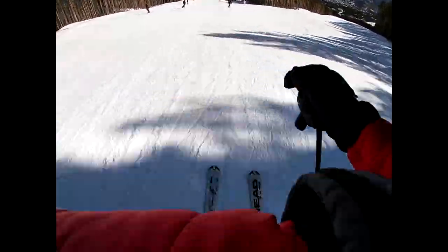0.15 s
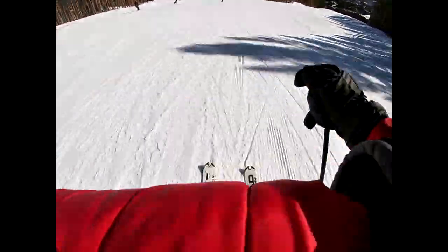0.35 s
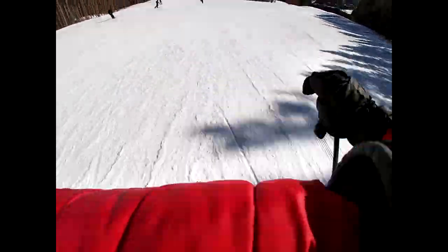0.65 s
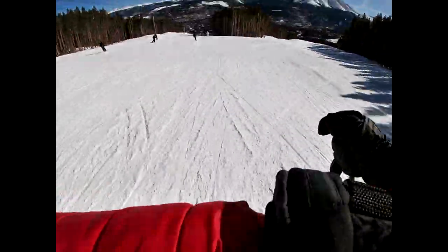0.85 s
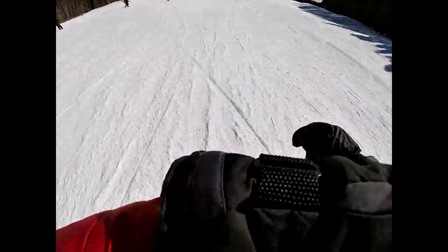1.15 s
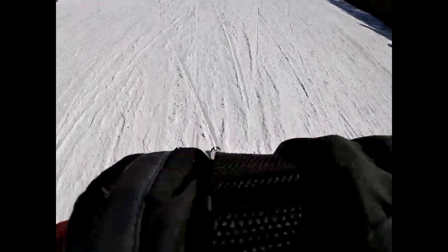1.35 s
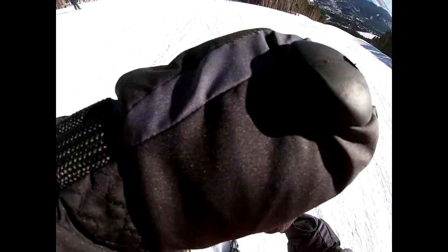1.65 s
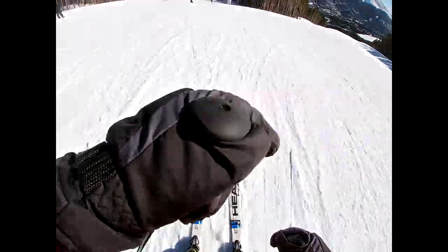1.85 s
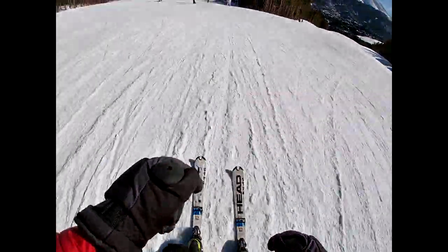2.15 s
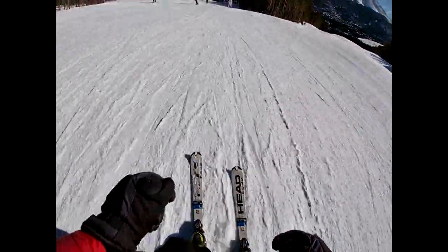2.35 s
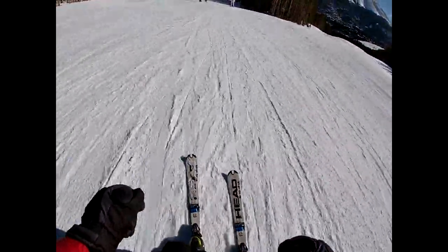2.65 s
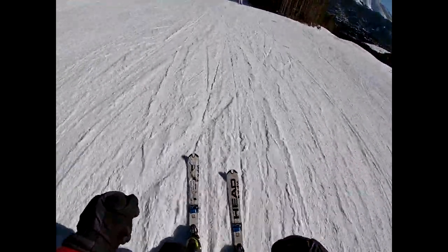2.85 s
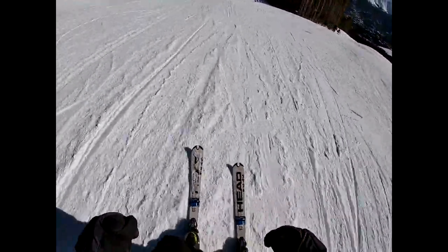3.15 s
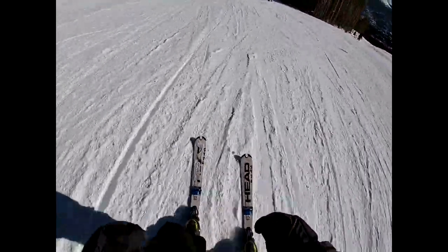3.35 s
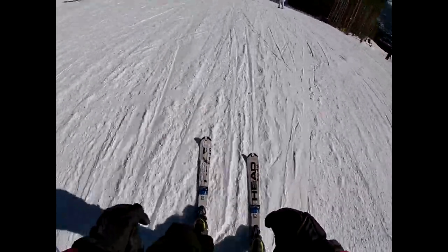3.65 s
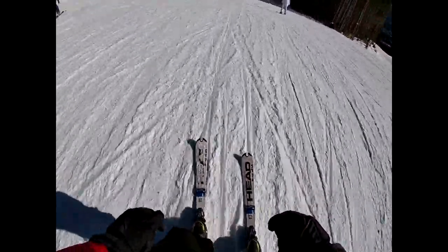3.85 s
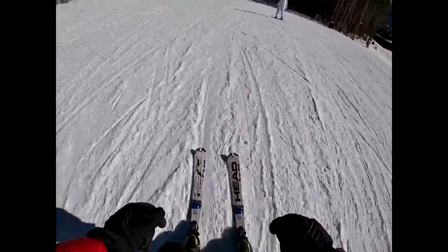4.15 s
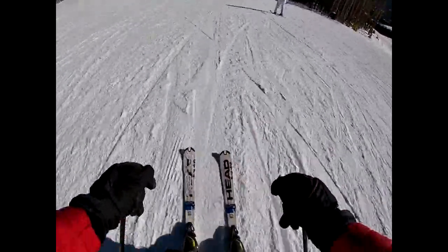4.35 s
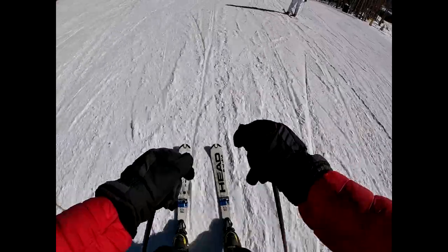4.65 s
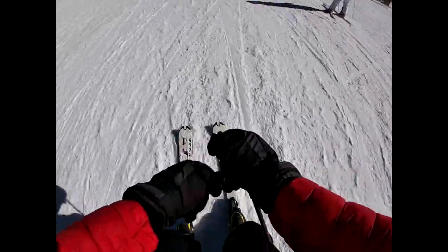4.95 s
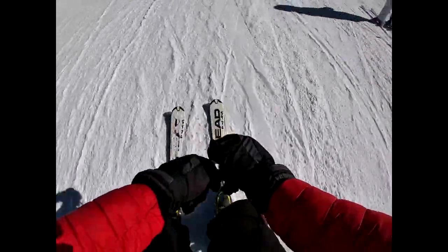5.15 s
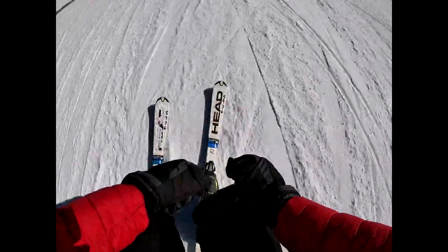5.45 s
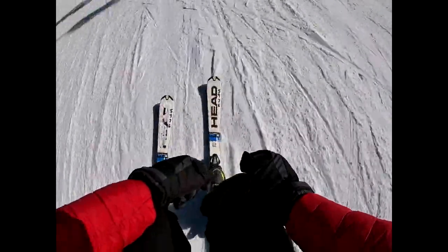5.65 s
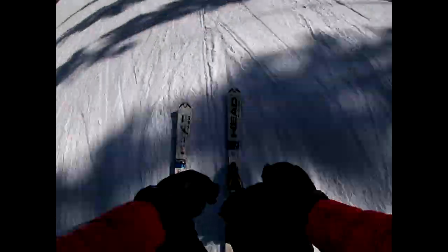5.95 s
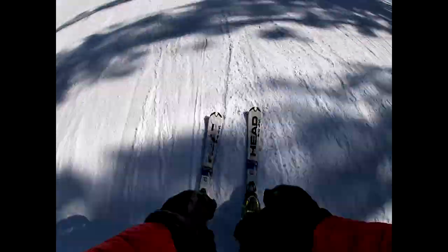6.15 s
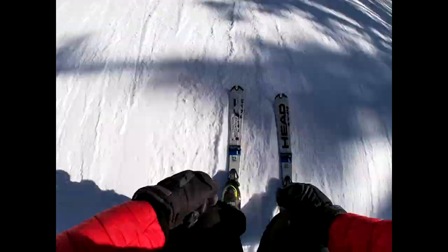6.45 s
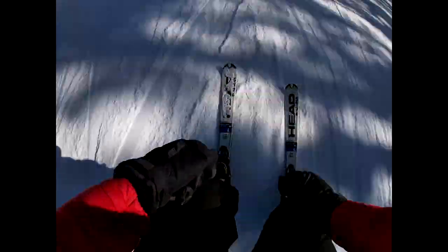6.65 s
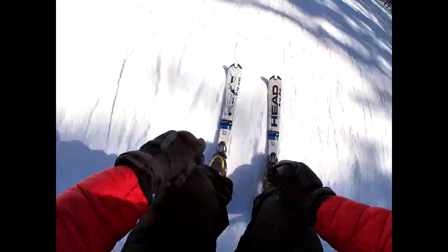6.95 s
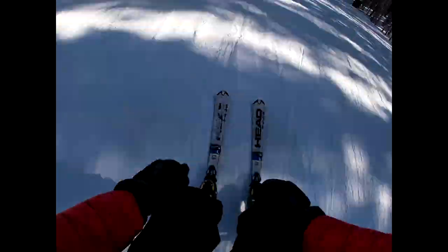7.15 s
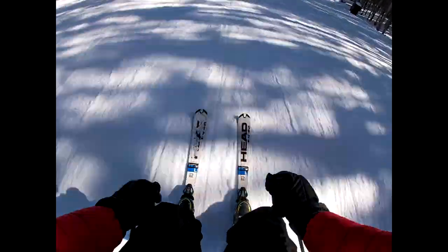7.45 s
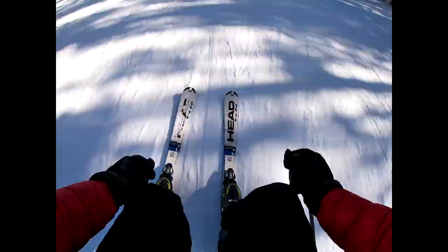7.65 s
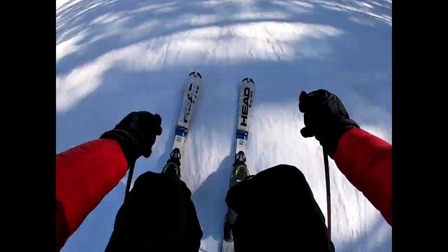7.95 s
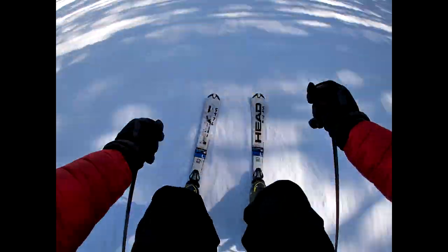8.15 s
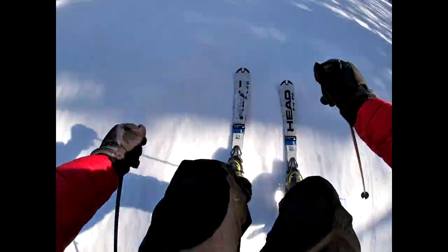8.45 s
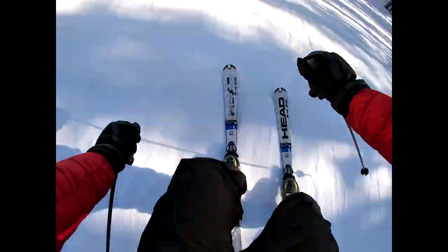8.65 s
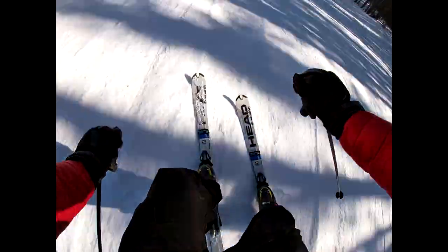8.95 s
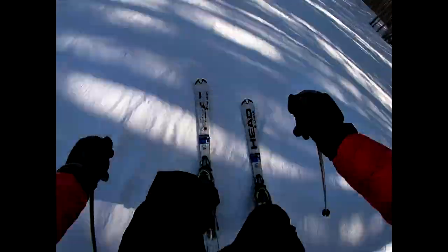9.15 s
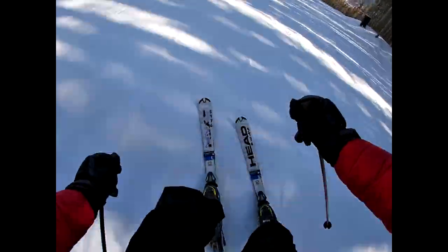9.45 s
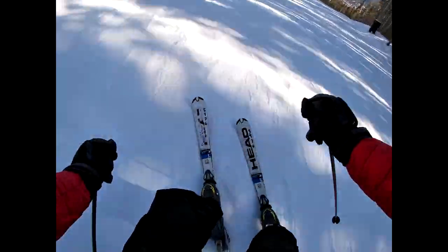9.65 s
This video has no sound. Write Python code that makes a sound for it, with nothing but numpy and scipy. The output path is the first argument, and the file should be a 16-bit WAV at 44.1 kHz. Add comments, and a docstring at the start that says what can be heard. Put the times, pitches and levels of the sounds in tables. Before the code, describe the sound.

Wind rumbles and buffets a chest-worn microphone while skis scrape, hiss and clack over hard, grainy snow, the scraping growing harsher toward the end.

```python
"""A groomed ski slope in the open, heard from a small camera on the skier's chest, the skis below.
Wind over the microphone port rumbles, buffets and tears into a rough flutter: filtered noise in gusts.
Gloves and sleeves passing close to the port add slaps, hollow wakes and one tick.
The ski edges grind over snow grains (dense random clicks), ring through damped resonances,
skid, hiss, throw a fine spray, swish, thud and clack on hard ridges."""
import sys
import numpy as np
from scipy import signal
from scipy.fft import rfft, irfft
from scipy.io import wavfile
from scipy.ndimage import uniform_filter1d, map_coordinates

SR = 44100
rng = np.random.default_rng(int(sys.argv[2]) if len(sys.argv) > 2 else 0)


def dump_mix(stems):
    """Bounce the given channels to the path in sys.argv[1] as a 16-bit WAV at rate SR."""
    frames = np.atleast_2d(stems).T  # one column per channel
    limited = np.clip(frames, -1, 1)  # hard clip at full scale
    pcm = np.round(limited * 32767).astype(np.int16)
    wavfile.write(sys.argv[1], SR, pcm)


N = 432180
TIME = np.arange(N) / SR


def undb(db):
    """Decibels to gain."""
    return 10 ** (np.asarray(db) / 20)


def unit(x):
    """Scale to an rms of one."""
    return x / np.sqrt(np.mean(x ** 2))


def controls(table):
    """The columns of a curve table after its time column, one value per sample."""
    s, *columns = np.transpose(table)
    return [np.interp(TIME, s, column) for column in columns]


def colour(x, outline):
    """Filter by an outline of (freq_hz, gain_db), joined by straight lines over log frequency."""
    hz, db = np.transpose(outline)
    bins_hz = np.maximum(np.arange(N // 2 + 1) * SR / N, 1)
    gain = undb(np.interp(np.log(bins_hz), np.log(hz), db))
    return irfft(rfft(x) * gain, N)


def noise():
    """White noise."""
    return rng.standard_normal(N)


def walk(rate):
    """Smooth random curve with rate knots a second; rms of one, extremes softened."""
    knots = rng.standard_normal(N // 20)
    curve = map_coordinates(knots, [TIME * rate], order=2, mode="wrap")
    return unit(np.tanh(curve))


def steady(x, span):
    """Even out the swells that last longer than span seconds."""
    power = uniform_filter1d(x ** 2, int(span * SR))
    return x / np.sqrt(power + 1e-12)


def bursts(times, levels_db, rise_s, decay_s):
    """An envelope that jumps up at each time and dies away."""
    out = np.zeros(N)
    age = np.arange(SR // 10) / SR
    shape = (1 - np.exp(-age / rise_s)) * np.exp(-age / decay_s)
    for s, db in zip(times, levels_db):
        i = int(s * SR)
        out[i:i + len(age)] += undb(db) * shape[:N - i]
    return out


def swells(table, attack_s, release_s):
    """Attack, hold and release for each (start, hold length, size) row, summed."""
    out = np.zeros(N)
    for s, length, size in table:
        corners = [s - attack_s, s, s + length, s + length + release_s]
        part = slice(*np.searchsorted(TIME, [corners[0], corners[-1]]))
        out[part] += size * np.interp(TIME[part], corners, [0, 1, 1, 0]) ** 2
    return out


def gain_swells(table, attack_s, release_s):
    """A gain envelope from (start, hold length, dB) rows."""
    gains = [(s, length, undb(db)) for s, length, db in table]
    return swells(gains, attack_s, release_s)


def with_swells(base_db, table, attack_s, release_s):
    """A level in dB with the power of (start, hold length, dB) swells on top."""
    powers = [(s, length, undb(db) ** 2) for s, length, db in table]
    return 10 * np.log10(undb(base_db) ** 2 + swells(powers, attack_s, release_s))


def grains(rate, spread_db):
    """Snow crystals breaking: random clicks, rate a second, of unequal but capped size."""
    hit = rng.random(N) < rate / SR
    size = undb(spread_db * np.minimum(rng.exponential(size=N), 3))
    return unit(hit * size * np.clip(noise(), -2, 2))


# steady airflow at the port, weakest from 2 to 3 s; columns: time_s, rumble_db, buffet_db
AIRFLOW = [(0, -23, -32), (.65, -24, -35.5), (1.12, -19, -32), (1.37, -28.5, -34), (1.47, -32.5, -32),
           (1.572, -19, -28), (1.6, -22, -20), (1.995, -17.5, -23.5), (2.035, -37, -37.5),
           (2.35, -37.5, -43), (2.5, -31, -41), (3, -34.5, -39), (3.2, -27.5, -33), (4, -26, -32),
           (5.3, -23, -29.5), (5.9, -21, -30), (6.2, -22.5, -30.5), (6.75, -24.5, -31.5), (7.9, -23.5, -31),
           (8.5, -20, -30.5), (9.1, -26.5, -31.5), (9.8, -28, -36.5)]
# brief changes of that airflow, mostly lulls; columns: start_s, hold_s, change_db
LULLS = [(.55, 0.042, -4.5), (1.535, .025, -7), (1.64, .022, -1.5), (1.732, 0.016, 3), (1.938, .014, -1),
         (3.46, 0.14, -2), (3.74, 0.098, -2), (4.25, 0.019, -2), (5.16, 0.045, 1), (5.53, 0.052, -5),
         (6.11, 0.053, -1.5), (6.365, 0.043, -1), (6.53, .02, -1), (6.75, 0.047, -8), (7.13, 0.075, -4.5),
         (7.4, 0.022, -9), (7.88, 0.063, -4), (8.7, 0.055, -5)]
# gusts on top of the airflow; columns: start_s, hold_s, rumble_db, buffet_db, tear_db
GUSTS = [(0.092, 0.18, -29, -27, -36.5), (0.432, 0.067, -19, -30.5, -37), (0.728, 0.08, -16.5, -21, -28.5),
         (0.827, 0.11, -17, -26.5, -33.5), (0.968, 0.13, -17, -19, -31.5), (1.224, 0.046, -19.5, -24, -44),
         (1.584, 0.03, -18, -18, -39), (1.673, 0.052, -18, -15.5, -23.5), (1.772, 0.16, -27, -15.5, -32.5),
         (1.957, 0.014, -24, -15.5, -32), (3.295, 0.091, -27, -32, -50), (3.646, 0.032, -19, -37, -51),
         (4.038, 0.17, -23, -23.5, -31), (4.371, 0.039, -17.5, -28.5, -35), (4.584, 0.12, -22, -26.5, -51),
         (5.012, 0.12, -20.5, -24, -31.5), (5.607, 0.1, -24, -38, -49), (6.23, 0.025, -21, -34, -29.5),
         (6.438, 0.063, -19.5, -30, -32.5), (6.602, 0.048, -23, -32, -35),
         (6.838, 0.102, -18, -30.5, -30.5), (7.037, 0.033, -20, -41, -35.5),
         (7.614, 0.037, -19.5, -34, -53), (7.756, 0.074, -27, -25.5, -36), (8.03, 0.23, -22, -29, -39),
         (8.273, 0.089, -29, -21, -31.5), (8.47, 0.091, -25, -33, -39), (8.782, 0.028, -26, -26, -29),
         (9.199, 0.049, -23.5, -35, -30.5), (9.342, 0.15, -23, -31, -37)]
TEAR_ONSET_DB, TEAR_GROWTH = -32.5, 0.39  # reference buffeting; extra dB of tearing per dB from there
TEAR_UNDER_DB = -13  # tearing at the reference, relative to the buffeting


def air_levels():
    """Rumble, buffeting and tearing in dB: steady airflow with lulls, and the power of gusts added."""
    rumble_db, buffet_db = controls(AIRFLOW)
    lull_db = swells(LULLS, attack_s=0.011, release_s=0.011)
    rumble_db = rumble_db + lull_db + 2.0 * walk(rate=14)
    buffet_db = buffet_db + lull_db + 1.57 * walk(rate=14)
    # tearing grows faster with wind speed than the buffeting does
    tear_db = buffet_db + TEAR_UNDER_DB + TEAR_GROWTH * (buffet_db - TEAR_ONSET_DB)
    s, length, *gust_dbs = np.transpose(GUSTS)
    return [with_swells(flow_db, zip(s, length, gust_db), attack_s=0.0093, release_s=0.017)
            for flow_db, gust_db in zip([rumble_db, buffet_db, tear_db], gust_dbs)]


# colour of large eddies; columns: freq_hz, gain_db
RUMBLE_COLOUR = [(12, -9.5), (25, 3), (50, 1.5), (85, -0.5), (130, -8.5), (190, -27.5), (350, -53),
                 (800, -86)]
# colour of small eddies; columns: freq_hz, gain_db
BUFFET_COLOUR = [(60, -9.5), (130, 1.5), (210, 0.5), (310, -7), (480, -17.5), (900, -31.5), (2500, -92)]
# colour of flow tearing at the port; columns: freq_hz, gain_db
TEAR_COLOUR = [(150, -37.5), (380, 5.5), (700, -1), (1200, -8.5), (2500, -19), (4200, -30), (5800, -49),
               (7500, -68.5), (14000, -105)]


def wind(rumble_db, buffet_db, tear_db, eddy_db):
    """Large eddies rumble, small ones come in flurries, and the flow tears at the edge of the port."""
    flurry = walk(rate=70)
    rumble = steady(colour(noise(), RUMBLE_COLOUR), span=0.087)
    buffet = steady(colour(noise() * undb(eddy_db * flurry), BUFFET_COLOUR), span=0.04)
    # the flow separates on the pressure peaks, so the tearing comes in short rasps
    push = np.abs(rumble + buffet) ** 1.03 + 0.5
    tear = steady(colour(noise() * push * undb(1.4 * flurry), TEAR_COLOUR), span=0.19)
    return rumble * undb(rumble_db) + buffet * undb(buffet_db) + tear * undb(tear_db)


# large single eddies at the port, before the trim puff_db; columns: centre_s, level_db
PUFFS = [(1.135, -19), (1.18, -24), (2.003, -23), (3.665, -18.5), (3.88, -20), (3.93, -20.5), (4.06, -17),
         (4.183, -18.5), (4.39, -15.5), (4.6, -16.5), (4.682, -16.5), (4.905, -19.5), (4.95, -18.5),
         (5.05, -13.5), (5.243, -15), (5.283, -16.5), (5.4, -19), (5.472, -19), (5.63, -17.5), (5.71, -16),
         (5.79, -18.5), (5.987, -15.5), (6.25, -16), (6.471, -13.5), (6.6, -23), (6.652, -15.5),
         (6.975, -14.5), (7.06, -17), (7.3, -16), (7.37, -25), (7.645, -16), (7.812, -19.5), (8.053, -16),
         (8.21, -14), (8.29, -16), (8.525, -14.5), (8.815, -13.5), (8.96, -20), (9.225, -20), (9.425, -21)]
# their low, soft colour; columns: freq_hz, gain_db
PUFF_COLOUR = [(30, -24), (70, -2.5), (120, 0.5), (200, -7.5), (330, -20.5), (800, -45), (2000, -90)]


def puffs(length_s, puff_db):
    """Each large eddy presses on the port with a rounded swell of a few low cycles."""
    envelope = sum(undb(db) * np.exp(-(2 * (TIME - s) / length_s) ** 2) for s, db in PUFFS)
    return steady(colour(noise(), PUFF_COLOUR), span=0.0173) * envelope * undb(puff_db)


# the wake of a glove or sleeve crossing close to the port; columns: start_s, hold_s, level_db
WAKES = [(1.038, 0.05, -26.5), (1.594, .015, -26), (1.784, .022, -25), (1.823, .022, -23),
         (1.866, 0.024, -21), (1.91, .022, -25), (1.963, .02, -20.5)]
# its hollow colour; columns: freq_hz, gain_db
WAKE_COLOUR = [(130, -25), (210, -1), (280, 4), (390, -0.5), (500, -12), (800, -30), (2000, -74)]


def wakes(attack_s, release_s, flutter_db):
    """Small, fast eddies shed by the arms: higher than the buffeting and full in the low middle."""
    envelope = gain_swells(WAKES, attack_s, release_s)
    flutter = noise() * undb(flutter_db * walk(rate=110))
    return steady(colour(flutter, WAKE_COLOUR), span=0.018) * envelope


# eddies that slap the port, most shed by the passing gloves, before the trims rasp_db and thump_db
# columns: start_s, level_db, thump_relative_db
SLAPS = [(0.785, -13, -1.5), (0.833, -16.5, -4), (0.886, -17.5, 5.5), (0.942, -19.5, 1),
         (1.002, -11.5, -11), (1.03, -17, 2), (1.052, -13.5, 1), (1.08, -23, 5.5), (1.232, -29, 9),
         (1.583, -17.5, 7), (1.675, -14.5, -4), (1.713, -10.5, -3), (1.784, -23, 4), (1.828, -21, 13),
         (1.905, -13, -18), (1.923, -8, -5), (1.958, -23.5, 15.5), (5.042, -18, -11), (7.286, -19, -12),
         (7.766, -18, 0), (8.347, -9.5, -13)]
# colour of the rasp; columns: freq_hz, gain_db
RASP_COLOUR = [(150, -23), (400, 6), (800, 1), (1300, -4), (2200, -15), (4200, -29), (5800, -45),
               (7500, -67), (14000, -105)]


def slaps(rasp_db, thump_db):
    """A single hard eddy: a short rasp over a low thump that rises more slowly."""
    s, db, low_db = np.transpose(SLAPS)
    rasp = steady(colour(noise(), RASP_COLOUR), span=0.0084)
    rasp = rasp * bursts(s, db, rise_s=0.0016, decay_s=0.0047)
    thump = steady(colour(noise(), BUFFET_COLOUR), span=0.016)
    thump = thump * bursts(s, db + low_db, rise_s=0.0076, decay_s=0.0096)
    return undb(rasp_db) * rasp + undb(thump_db) * thump


# colour of a glove on the camera housing; columns: freq_hz, gain_db
TICK_COLOUR = [(600, -7), (1500, 11), (4000, 0), (5800, -6), (7500, -24), (10500, -31), (14000, -75)]


def glove_tick(at_s, level_db):
    """The glove clips the camera housing once as it swings by: a very short burst of noise."""
    return unit(colour(noise(), TICK_COLOUR)) * bursts([at_s], [level_db], rise_s=0.0003, decay_s=0.003)


# dark colour of a ski slipping sideways or landing flat; columns: freq_hz, gain_db
SKID_COLOUR = [(100, -12), (330, -1), (600, 1), (800, -1), (1150, -7.5), (1800, -9.5), (4000, -59),
               (9000, -64)]
# a ski drops flat on the snow, before the trim thud_db; columns: start_s, level_db
THUDS = [(2.443, -26), (6.044, -21.5), (8.856, -24), (8.957, -22), (9.213, -19), (9.747, -15)]


def thuds(decay_s, thud_db):
    """The whole base meets the snow at once: a dull burst with the dark colour of a skid."""
    s, db = np.transpose(THUDS)
    envelope = bursts(s, db + thud_db, rise_s=0.00045, decay_s=decay_s)
    return steady(colour(noise(), SKID_COLOUR), span=0.008) * envelope


# the edges cut through loose snow; columns: start_s, hold_s, level_db
SWISHES = [(7.853, 0.066, -42), (7.958, 0.25, -44), (8.64, 0.075, -47), (9.25, 0.23, -42),
           (9.72, 0.097, -40)]
# its bright colour; columns: freq_hz, gain_db
SWISH_COLOUR = [(2200, -40), (3300, -1), (4000, 5), (4600, -6), (5800, -26), (8000, -50)]


def swishes(attack_s, release_s):
    """Loose crystals sheared off by an edge: bright grains of very unequal size."""
    envelope = gain_swells(SWISHES, attack_s, release_s)
    return unit(colour(grains(rate=7400, spread_db=11.5), SWISH_COLOUR)) * envelope


# colour of the edges scraping on snow; columns: freq_hz, gain_db
SCRAPE_COLOUR = [(250, -26.5), (800, -1.5), (1400, 3), (2100, 2), (3000, -1.5), (3700, -5.5), (4500, -11.5),
                 (5600, -9), (6300, -18.5), (7500, -32.5), (10500, -37.5), (14000, -82)]
# main resonance as the skis bend; columns: time_s, pitch_hz
RING_PITCH = [(0, 1648), (.24, 1681), (.45, 1615), (.7, 1668), (.9, 1615), (2.6, 1666), (3.1, 1622),
              (3.26, 1658), (4.45, 1597), (4.62, 1653), (4.8, 1605), (6.2, 1636), (6.45, 1609),
              (6.68, 1698), (6.85, 1797), (7.05, 1600), (8.4, 1634), (9.15, 1617), (9.8, 1618)]
# skis knocking on hard ridges, before the trims body_db and edge_db
# columns: start_s, level_db, ring_relative_db, snap_relative_db
KNOCKS = [(0.245, -25, 3, -17), (0.884, -22.5, 6, -14), (1.265, -23.5, 0, -7), (2.155, -39, -6, -1),
          (2.89, -21, -5, -3), (3.093, -21, -6, -3), (3.190, -21, -2, -3), (3.215, -20, -3, -4),
          (3.57, -23, -11, 1.5), (4.016, -14.5, -4, -4.5), (4.103, -7, -9, -8), (4.211, -14.5, 4.5, -4),
          (4.376, -20, 1, -2), (4.652, -14, 4, -12), (6.043, -24, -8, -2.5), (6.147, -22.5, -2, -4.5),
          (6.416, -22, 4, -13), (6.459, -15.5, -4, -4.5), (6.865, -15.5, -10, -3.5), (6.912, -22, -10, -2),
          (7.061, -23, -16, -1), (7.235, -28, -12, -5), (7.314, -24, -8, -4), (7.449, -21, -16, -1),
          (7.898, -13, -17, -2.5), (8.497, -11, -9, -10), (8.545, -16, -8, -0.5), (8.624, -22, -3, -7),
          (8.647, -18, -3, -2), (8.701, -21, -8, -7), (8.719, -18, -6, -1), (8.782, -16, -3, -4),
          (8.852, -21, -3, -7), (9.152, -18, -10, -2), (9.744, -20, -9, -0.5)]


def knocks(ring_s, snap_s, body_db, edge_db, wobble):
    """Each ridge gives a short crunch that snaps at the edge and rings the ski at its main resonance."""
    s, db, ring_db, snap_db = np.transpose(KNOCKS)
    pitch_hz = controls(RING_PITCH)[0] * (1 + wobble * walk(rate=500))
    tone = unit(np.sin(2 * np.pi * np.cumsum(pitch_hz) / SR))
    body = tone * bursts(s, db + ring_db, rise_s=0.00075, decay_s=ring_s)
    crunch = unit(colour(noise(), SCRAPE_COLOUR))
    edge = crunch * bursts(s, db + snap_db, rise_s=0.00008, decay_s=snap_s)
    return undb(body_db) * body + undb(edge_db) * edge


# resonances of the skis before bending, main one first; columns: freq_hz, width_hz, gain_db
SKI_MODES = [(1611, 62, 4.5), (1720, 400, -11.5), (1920, 220, -11.5)]


def ski_body(x):
    """Ring the damped resonances of the skis; reading at a varying speed bends their pitch."""
    ring = sum(undb(db) * signal.lfilter(*signal.iirpeak(hz, hz / width, fs=SR), x)
               for hz, width, db in SKI_MODES)
    bend = controls(RING_PITCH)[0] / SKI_MODES[0][0]
    flex_s = 0.001002 * walk(rate=12)
    return map_coordinates(ring, [np.cumsum(bend) + flex_s * SR], order=3, mode="mirror")


# The levels in these tables are before the trims in skis().
# edge load from turn to turn, and spray of loose snow; columns: time_s, scrape_db, spray_db
EDGES = [(0.0, -40, -61), (0.35, -41.5, -71), (0.8, -38.5, -72), (1.2, -50, -97), (1.5, -43, -74),
         (1.9, -46, -98), (2.05, -52.5, -78), (2.35, -49, -77), (2.5, -41, -83), (2.78, -40.5, -69),
         (2.92, -38, -61.5), (3.2, -37, -56), (3.55, -38, -64.5), (4.0, -37, -58.5), (5.25, -39, -59),
         (5.55, -35, -54.5), (5.8, -36.5, -53.5), (6.1, -40.5, -60), (6.3, -38, -55), (6.55, -35, -52.5),
         (6.85, -35, -55.5), (7.1, -41.5, -62.5), (7.5, -40.5, -64), (7.9, -36.5, -54), (8.2, -39.5, -56),
         (8.82, -38.5, -58.5), (8.98, -33.5, -55), (9.25, -32.5, -51.5), (9.62, -34, -53.5),
         (9.8, -34.5, -47.5)]
# the edges bite into firmer snow and let go abruptly; columns: start_s, hold_s, change_db
BITES = [(1.24, 0.1, 2), (2.48, 0.021, 2), (3.56, 0.055, 1.5), (3.82, 0.11, 2.5), (4.08, 0.1, 3),
         (5.41, 0.06, 2.5), (6.84, 0.13, -0.5), (7.15, 0.029, 4), (7.83, 0.016, 3), (8.465, 0.09, 5),
         (8.625, 0.041, 4.5), (8.688, 0.038, 6), (9.08, 0.07, 1.5)]
# the skis go light over a crest and the scrape thins out; columns: start_s, hold_s, change_db
CRESTS = [(2.64, .03, -1), (2.77, .05, -2), (4.273, .06, -0.5), (5.161, .05, -2), (7.1, .025, -2),
          (8.575, .035, -3), (8.745, .022, -2.5), (8.81, 0.024, -2), (9.675, 0.023, -3)]
# the skis slip sideways; columns: start_s, hold_s, skid_db
SKIDS = [(0.092, 0.2, -35.5), (0.669, 0.098, -36.5), (2.8, 0.36, -45), (3.044, 0.19, -36.5),
         (4.036, 0.2, -40), (5.458, 0.42, -35.5), (7.438, 0.063, -39.5), (8.325, 0.25, -42),
         (8.63, 0.058, -42), (8.98, 0.675, -32), (9.13, 0.28, -35), (9.71, .09, -31.5),
         (9.755, 0.045, -27.5)]
# the skis chatter and sing; columns: start_s, hold_s, ring_db
CHATTERS = [(0.026, .13, -45), (0.182, 0.09, -37), (.33, 0.31, -39.5), (0.658, 0.1, -35), (.87, 0.18, -41),
            (1.15, .4, -49), (2.54, 0.076, -36), (2.676, 0.067, -39), (2.878, 0.14, -39), (3.053, 0.1, -36),
            (3.19, 0.1, -33), (3.416, 0.051, -39), (4.376, 0.17, -30.5), (4.55, .15, -44),
            (4.74, 0.33, -37.5), (6.141, 0.14, -39), (6.349, 0.17, -35.5), (6.54, 0.13, -39),
            (6.713, 0.15, -41), (7.15, .06, -42), (8.37, 0.13, -34.5), (9.04, 0.2, -43)]
SLIP_ATTACK_S, SLIP_RELEASE_S = 0.03, 0.035
SKID_UNDER_DB, RING_UNDER_DB = -2, -3.5  # clean glide relative to the scrape, before the trims
GLIDE_KNEE_DB, GLIDE_FALL = -40.5, 0.96  # edge load below which the skis run flat; extra fall, dB per dB


def ski_levels():
    """Edge load sets scrape, skid and ring; bites, slips and chatter swell out of it, crests thin it."""
    load_db, spray_db = controls(EDGES)
    change_db = swells(BITES + CRESTS, attack_s=0.014, release_s=0.014)
    scrape_db = load_db + change_db + 0.68 * walk(rate=13)
    # on flat skis the skid and ring fall faster than the scrape
    glide_db = scrape_db - GLIDE_FALL * np.maximum(GLIDE_KNEE_DB - load_db, 0)
    skid_db = with_swells(glide_db + SKID_UNDER_DB, SKIDS, SLIP_ATTACK_S, SLIP_RELEASE_S)
    glide_ring_db = glide_db + RING_UNDER_DB + 0.52 * walk(rate=16)
    ring_db = with_swells(glide_ring_db, CHATTERS, SLIP_ATTACK_S, SLIP_RELEASE_S)
    return scrape_db, skid_db, ring_db, spray_db


# colour of the sliding bases; columns: freq_hz, gain_db
HISS_COLOUR = [(3500, -12.5), (4500, -9), (4950, 1), (5450, 1), (5900, -2.5), (6500, -18), (7400, -40),
               (12000, -51.5)]
# colour of fine thrown snow; columns: freq_hz, gain_db
SPRAY_COLOUR = [(2000, -6), (4400, 6), (5500, 9.5), (6500, 4.5), (7500, -3), (9000, -2.5), (10400, -6),
                (11500, -12.5), (14000, -24)]


def skis(scrape_db, skid_db, ring_db, spray_db):
    """Grains on ridged snow: edge pressure drives scrape and ring, ridges stir hiss and spray."""
    ridges = undb(1.3 * walk(rate=48))
    pressure = unit(ridges ** 0.7 * undb(0.5 * walk(rate=120)))
    scrape = unit(colour(grains(rate=6500, spread_db=0.5) * pressure, SCRAPE_COLOUR))
    # the skid flickers on its own
    skid = unit(colour(grains(rate=4000, spread_db=-0.5) * undb(2.0 * walk(rate=60)), SKID_COLOUR))
    strike = colour(grains(rate=4000, spread_db=5.0) * np.sqrt(pressure), SCRAPE_COLOUR)
    ring = steady(ski_body(strike), span=0.06)
    spray = unit(colour(grains(rate=24000, spread_db=3.5) * ridges ** 1.17, SPRAY_COLOUR))
    hiss_flicker = ridges * undb(3.6 * walk(rate=90))
    hiss = unit(colour(grains(rate=9900, spread_db=3.5) * hiss_flicker, HISS_COLOUR))
    # the sliding bases hiss both on the hard surface and on loose crystals
    loose_share = 0.48
    hiss_db = (1 - loose_share) * scrape_db + loose_share * spray_db
    # level trims of the layers, in dB
    edges = scrape * undb(scrape_db + 2.0) + skid * undb(skid_db + 2.0)
    edges = edges + ring * undb(ring_db - 2.3 + 1.4 * walk(rate=22))
    return edges + hiss * undb(hiss_db + 0.5) + spray * undb(spray_db + 10.0)


def scene():
    """Wind at the chest, skis below; open snow gives no echo."""
    air = wind(*air_levels(), eddy_db=3.0)
    air = air + puffs(length_s=0.028, puff_db=-2.5)
    air = air + wakes(attack_s=0.0072, release_s=0.016, flutter_db=2.0)
    air = air + slaps(rasp_db=0.0, thump_db=5.0)
    glove = glove_tick(at_s=1.584, level_db=-21)
    snow = thuds(decay_s=0.0065, thud_db=-0.5)
    snow = snow + swishes(attack_s=0.024, release_s=0.041)
    snow = snow + knocks(ring_s=0.0045, snap_s=0.0044, body_db=-6.5, edge_db=-3.5, wobble=0.05)
    snow = snow + skis(*ski_levels())
    return (air + glove + snow)[None]


def record(dry):
    """The camera microphone rounds the largest pressure peaks and cuts the top above 14 kHz."""
    ceiling = 0.85
    rounded = ceiling * np.tanh(dry / ceiling)
    top_cut = signal.ellip(8, 0.2, 70, 14000, fs=SR, output="sos")
    return signal.sosfilt(top_cut, rounded)


dry = scene()
out = record(dry)
dump_mix(out)
```